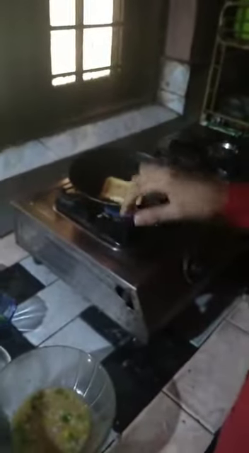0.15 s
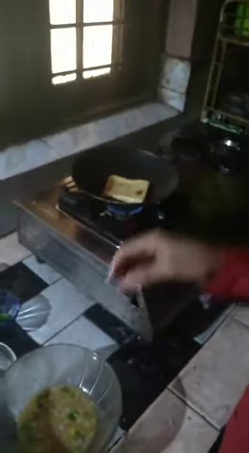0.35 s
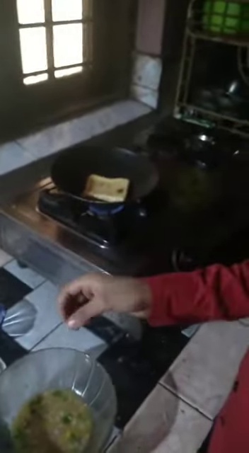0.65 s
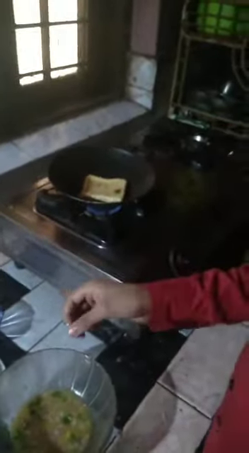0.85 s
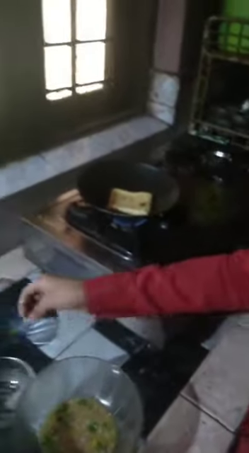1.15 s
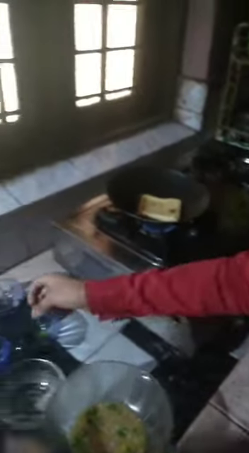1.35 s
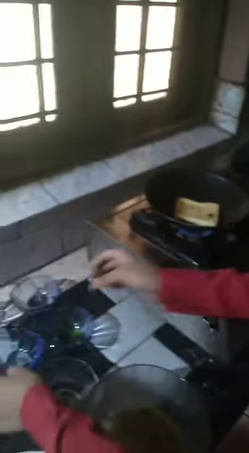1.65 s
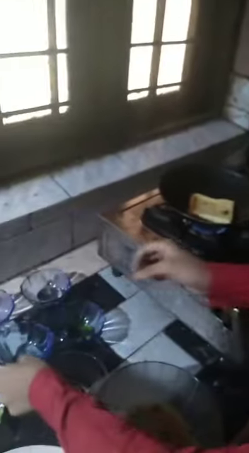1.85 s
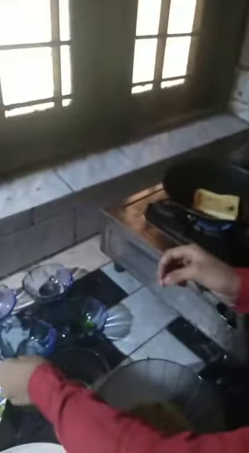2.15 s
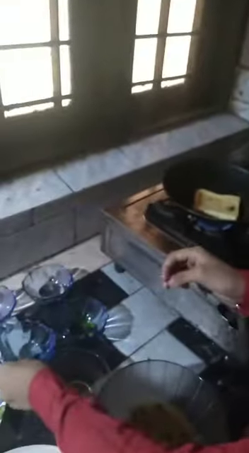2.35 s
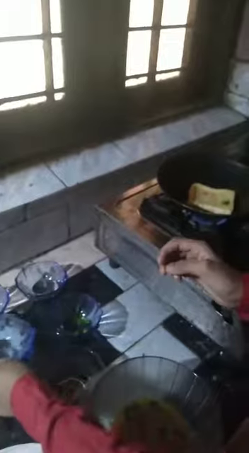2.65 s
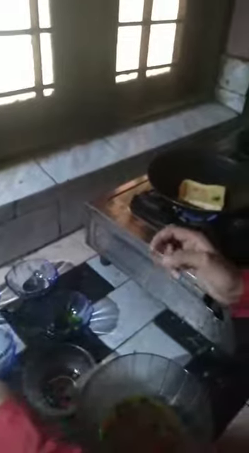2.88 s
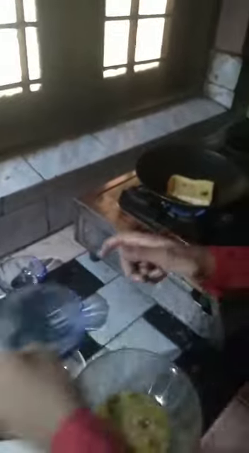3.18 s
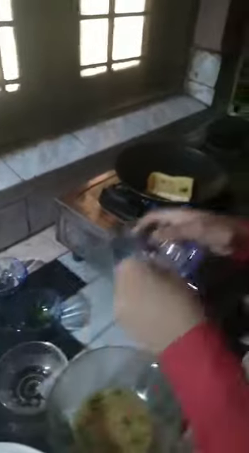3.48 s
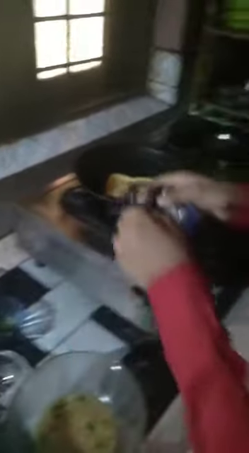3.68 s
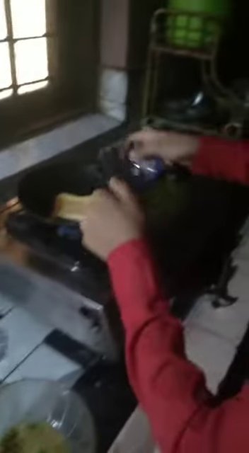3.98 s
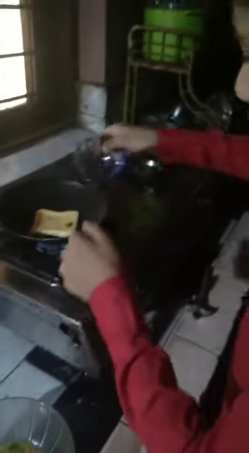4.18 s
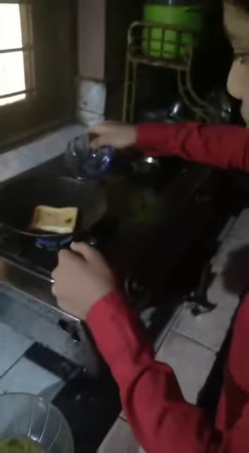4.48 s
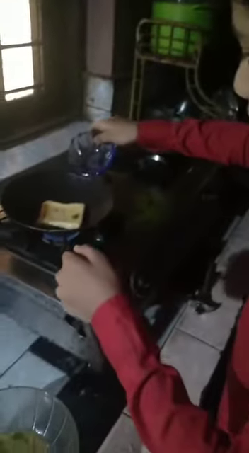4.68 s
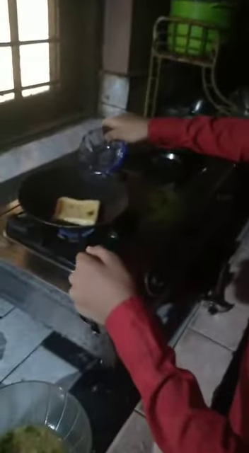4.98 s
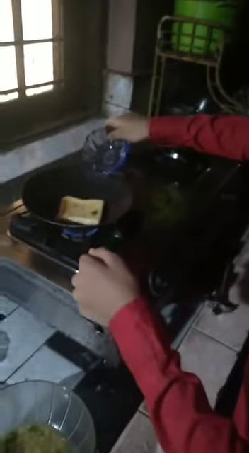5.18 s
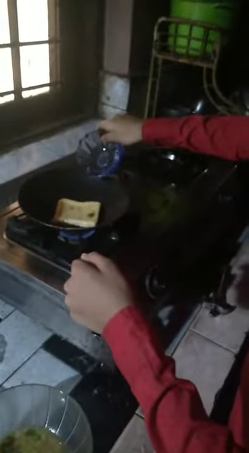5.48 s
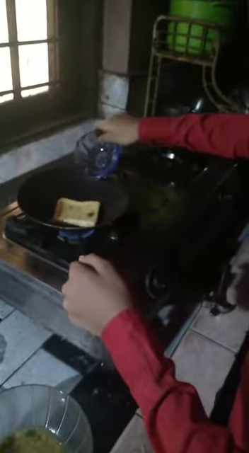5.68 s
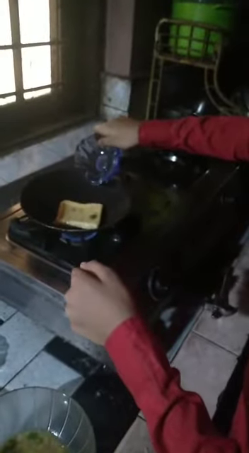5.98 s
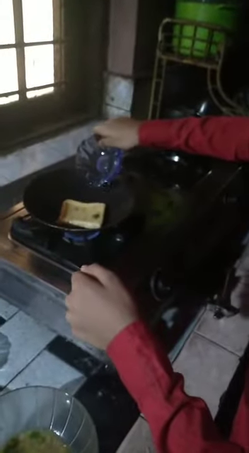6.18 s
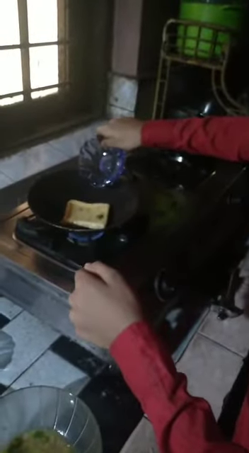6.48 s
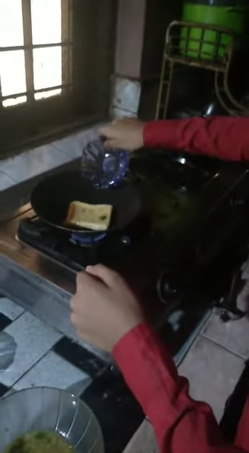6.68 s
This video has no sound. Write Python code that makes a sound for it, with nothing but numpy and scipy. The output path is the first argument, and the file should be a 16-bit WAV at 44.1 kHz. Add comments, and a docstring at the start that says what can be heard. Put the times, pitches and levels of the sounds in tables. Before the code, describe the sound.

A gas burner rumbles softly for the whole seven seconds in a small tiled kitchen, with the microphone close to the counter. From about 0.2 to 1.3 seconds a steel spatula knocks irregularly on a steel dish, and both ring briefly. The loudest knock comes at 0.5 seconds, and short, gritty scrapes join in between 0.8 and 1.3 seconds. At about 2.2 seconds a glass bowl rocks on the counter and clinks clearly against another, with a faint last tap at 2.6 seconds. Between 4.7 and 5.9 seconds come a few very quiet, dull bumps of things handled at the stove. Outside the window a small bird, distant and blurred by echoes, gives short falling chirps from the start until about 5.7 seconds, with a brief quavering whistle near 2.5 seconds. The last second holds only the burner.

```python
"""A small tiled kitchen, the microphone close to the counter. A gas burner rumbles softly all along, and
a small bird chirps outside the window, far off and smeared by echoes. Up close, a steel spatula knocks
on a steel dish, so that both ring, and sticks and slips as it is dragged over it. Then a glass bowl
rocks on the counter and clinks against another as it is picked up. Things handled at the stove give
soft bumps. Everything is centred; a faint delayed copy of some treble adds slight stereo width."""
import sys
import numpy as np
from scipy import signal
from scipy.fft import rfft, irfft
from scipy.io import wavfile
from scipy.ndimage import uniform_filter1d

SR = 44100
rng = np.random.default_rng(int(sys.argv[2]) if len(sys.argv) > 2 else 0)


def unload_wav(signal):
    """Save mono or channel-first audio to the path in sys.argv[1] as 16-bit WAV at rate SR, clipped to [-1, 1]."""
    wavfile.write(
        sys.argv[1],
        SR,
        np.round(np.clip(np.atleast_2d(signal).T, -1, 1) * 32767).astype(np.int16),
    )


N = 301644
TIME = np.arange(N) / SR
AGE = TIME[:24576]   # seconds since the start of one short sound

# Decay of the tiled room. Each row: frequency in Hz, t60 in seconds.
ROOM_T60 = [(200, 0.37), (1000, 0.44), (3000, 0.39), (6000, 0.3), (14000, 0.15)]
# The spatula blade's modes. Each row: frequency in Hz, relative level in dB, t60 in seconds before the cap.
SPATULA_MODES = [(1006.5, -11, 0.24), (1769, -12, 0.27), (1840, -12, 0.19), (1875, -15, 0.39),
                 (1968, -8, 0.15), (2065, -13, 0.068), (2386, -11.5, 0.11), (2228, -10, 0.15),
                 (2570, -11.5, 0.27), (2490, -11.5, 0.22), (2930, -13.5, 0.2), (3000, -12, 0.28),
                 (3100, -8.5, 0.14), (3295, -8.5, 0.32), (3100, -15.5, 0.53), (3250, -11.5, 0.74),
                 (3530, -14.5, 0.083), (3844, -12.5, 0.17), (5340, -16, 0.21), (5540, -13, 0.23),
                 (7030, -20, 0.3), (7000, -21, 0.19), (7660, -19.5, 0.12), (7900, -23, .15),
                 (8514, -25.5, .15), (10800, -29, 0.11), (11800, -25, 0.14), (12400, -32.5, .1)]
# Dense high modes of the steel. Each row: frequency in Hz, relative spectral density in dB.
STEEL_SPECTRUM = [(200, -28.5), (650, -22), (1000, -8.5), (1270, -14.5), (1800, -0.5), (2400, -4.5),
                  (2900, -0.5), (3400, 3), (4100, -2), (5300, -3.5), (6400, -10.5), (9000, -16),
                  (12500, -28), (16000, -34.5)]
# The hollow counter top. Each row: frequency in Hz, relative spectral density in dB.
COUNTER_SPECTRUM = [(60, -30.5), (130, -23.5), (180, -4.5), (250, 1), (330, -4), (420, 5), (560, -7),
                    (900, -1.5), (1500, -24.5), (4000, -60)]


def from_db(db):
    """Decibels to gain."""
    return 10 ** (np.asarray(db) / 20)


def rms_one(x):
    """Scale to an rms of 1."""
    return x / np.sqrt(np.mean(x ** 2) + 1e-20)


def at_hz(points, hz):
    """Read a table on a log-frequency axis."""
    f, value = np.transpose(points)
    return np.interp(np.log(hz + 0.00086), np.log(f), value)


def add(track, s, sound):
    """Mix a sound in at s seconds; what lies outside the track is dropped."""
    start = round(s * SR)
    sound, start = sound[max(-start, 0):], max(start, 0)
    track[start:start + len(sound)] += sound[:N - start]


def fade(t60):
    """Exponential decay, 60 dB down after t60 seconds."""
    return np.exp(-np.log(1000) / t60 * AGE)


def soft_rise(rise_s):
    """The onset of a gentle touch, which has no sharp edge."""
    return np.sin(np.pi / 2 * np.minimum(AGE / rise_s, 1)) ** 2


def noise(spectrum, slope_db=0, size=len(AGE)):
    """Coloured noise of rms 1, tilted by slope_db per octave: harder contacts favour the treble."""
    hz = np.fft.rfftfreq(size, 1 / SR)
    tilt = from_db(slope_db * np.log2(np.maximum(hz, 500) / 3000))
    bins = rfft(rng.standard_normal(size)) * from_db(at_hz(spectrum, hz)) * tilt
    return rms_one(irfft(bins, size))


def wash(spectrum, slope_db):
    """Dense modes and wall reflections of one blow: noise whose octaves die at the room's rates."""
    bins = rfft(noise(spectrum, slope_db))
    hz = np.fft.rfftfreq(len(AGE), 1 / SR)
    centres = 400 * 2. ** np.arange(6)
    return sum(irfft(bins * np.interp(hz, centres, share)) * fade(at_hz(ROOM_T60, centre))
               for centre, share in zip(centres, np.eye(len(centres))))


def ring(modes, spread_db=4.0, detune=0.0026, longest_t60=.28):
    """Modes struck once, each with its own strength and phase; contact pulls their pitch a little."""
    out = np.zeros(len(AGE))
    for hz, db, t60 in modes:
        strength = from_db(db + spread_db * rng.normal())
        pitch = hz * (1 + detune * rng.normal())
        decay = fade(min(t60, longest_t60))   # the cap keeps the ring short
        out += strength * decay * np.sin(2 * np.pi * (pitch * AGE + rng.random()))
    return out * np.minimum(AGE / .0007, 1)


def favour(modes, favoured_hz, contrast_db=15.5, width_octaves=0.049):
    """The point of contact drives the modes near one frequency harder than the rest."""
    driven = []
    for hz, db, t60 in modes:
        nearness = np.exp(-(np.log2(hz / favoured_hz) / width_octaves) ** 2)
        driven.append((hz, db + contrast_db * (nearness - 1 / 4), t60))
    return driven


def burner(rush_db=-55.5):
    """The gas flame's soft rush, with a lumpy low rumble."""
    # The rush. Each row: frequency in Hz, relative spectral density in dB.
    flame_spectrum = [(15, -71), (25, -34.5), (43, -23.5), (62, -2.5), (82, -6), (101, -8.5), (119, -18),
                      (183, -17), (215, -18.5), (281, -20), (378, -23), (523, -25), (2360, -35.5),
                      (3930, -37), (15500, -51)]
    # Low resonances of the flame. Each row: centre in Hz, width in Hz, level in dB.
    rumble_bands = [(83, 15, -58), (119.26, 18, -66.5), (175, 10, -72.5), (279.5, 30, -72.5)]
    out = from_db(rush_db) * noise(flame_spectrum, size=N)
    for hz, width, db in rumble_bands:
        resonance = signal.butter(2, [hz - width / 2, hz + width / 2], "band", fs=SR, output="sos")
        out += from_db(db) * rms_one(signal.sosfilt(resonance, rng.standard_normal(N)))
    return out


def sing(pitch, octave_db, sag_db=-7):
    """One bird note: a tone and its octave, coloured by throat and beak; it starts fast and weakens."""
    # Response of throat and beak. Each row: frequency in Hz, gain in dB.
    beak = [(2200, 1.5), (2800, -1.5), (3500, -1.5), (4000, 0), (5000, 3), (6000, -2.5), (7000, -8.5),
            (8000, -12.5)]
    phase = 2 * np.pi * np.cumsum(pitch) / SR
    fundamental = from_db(at_hz(beak, pitch)) * np.sin(phase)
    octave = from_db(octave_db + at_hz(beak, 2 * pitch)) * np.sin(2 * phase)
    sag = from_db(sag_db * np.linspace(-.5, .5, len(pitch)))
    return (fundamental + octave) * signal.windows.tukey(len(pitch), .2) * sag


def distant(note, direct, far_t60=0.92, near_t60=.45, near_db=3, build_s=.008):
    """On its way to the microphone, outside walls and the kitchen smear a note into echoes."""
    envelope = (fade(far_t60) + from_db(near_db) * fade(near_t60)) * (1 - np.exp(-AGE / build_s))
    echoes = rng.standard_normal(len(AGE)) * envelope
    echoes /= np.linalg.norm(echoes)
    echoes[0] += direct
    return signal.fftconvolve(note, echoes)


def bird(chirp_s=0.028, chirp_gain_db=5, rasp=.012, rasp_hz=1000, quaver=0.0093, quaver_hz=23):
    """Outside the window: chirps slide down with a slight flutter; whistles quaver around one pitch."""
    # Each row: start in seconds, relative level in dB, starting pitch in Hz.
    chirps = [(-.04, -50.5, 3350), (.934, -45, 4080), (1.677, -43, 3820), (2.38, -46, 4313),
              (3.445, -45.5, 3950), (4.025, -47, 3490), (4.319, -48.5, 3410), (4.594, -51.5, 3390),
              (4.932, -49.5, 3710), (5.294, -49.5, 3760), (5.709, -52, 3610)]
    # Each row: start in seconds, length in seconds, relative level in dB, pitch in Hz.
    whistles = [(2.538, 0.13, -54.5, 3834), (2.715, 0.029, -57, 3825)]
    usual_db, usual_top_hz, usual_end_hz = -48, 3700, 2330
    out = np.zeros(N)
    progress = np.linspace(0, 1, int(chirp_s * SR))
    slide = (1 - np.cos(np.pi * progress ** 1.1)) / 2   # lingers briefly on the top note
    for s, db, top_hz in chirps:
        raised_hz = top_hz - usual_top_hz
        end_hz = usual_end_hz + 0.26 * raised_hz
        octave_db = -7.5 - 0.78 * (db - usual_db) + 0.0004 * raised_hz   # louder, lower chirps are purer
        flutter = np.interp(progress * chirp_s * rasp_hz, np.arange(64), rng.standard_normal(64))
        pitch = top_hz + (end_hz - top_hz) * slide
        pitch *= 1 + rasp * np.sin(np.pi * slide * .8) * flutter
        add(out, s, from_db(db + chirp_gain_db) * distant(sing(pitch, octave_db), direct=0.2))
    for s, length, db, hz in whistles:
        pitch = hz * (1 + quaver * np.sin(2 * np.pi * quaver_hz * AGE[:int(length * SR)]))
        add(out, s, from_db(db) * distant(sing(pitch, octave_db=-19), direct=1.0))
    return out


def spatula_knocks(usual_db=-30, ring_db=-3.5, wash_db=0.5, trim_db=-1):
    """Steel on steel, up close: a crack, the ring of both parts, their wash and a thud in the counter."""
    # Each row: start in seconds, relative level in dB, brightness in dB per octave,
    # the dish's ring over the spatula's in dB, favoured frequency in Hz.
    knocks = [(.188, -31.5, 1, 13, 1620), (.208, -35, -2, 3.5, 982), (0.3472, -29.5, 0.5, 10, 3640),
              (0.4213, -50.5, -6, -27, 3330), (0.4836, -40.5, -5.5, 18, 2920), (0.505, -33, -7, -19, 2020),
              (0.519, -15.5, 1.5, -17.5, 2384), (0.5223, -20, -5, 10.5, 1051),
              (.674, -29.5, -1.5, -7.5, 1844), (.773, -39.5, -7.5, -9, 1860), (1.011, -45, 2, 16, 1020),
              (1.0258, -29, -1, -14, 1913), (1.1035, -38.5, -5.5, -6, 3150), (1.122, -38.5, 7.5, -29, 8700),
              (1.1681, -36.5, -1.5, -13, 3320), (1.172, -31.5, -1, -14, 1960),
              (1.1917, -30, 1.5, -16, 7800), (1.199, -29, -1, -12, 2100)]
    # The steel dish. Each row: frequency in Hz, relative level in dB, t60 in seconds before the cap.
    dish_modes = [(866, -12.5, 0.16), (956.5, -1, 0.16), (1086, -10.5, 0.13), (1446, -1, 0.16),
                  (1533, -10, 0.27), (1830, -14.5, .35), (2303, -1.5, 0.61), (2600, -10, 0.24),
                  (3294, 0, 0.28), (3400, -9, 0.34), (4032, -7.5, .23), (4610, -11.5, 0.37),
                  (6800, -17, 0.23), (7160, -22.5, .18)]
    out = np.zeros(N)
    thud_envelope = fade(ROOM_T60[0][1]) * (1 - np.exp(-AGE / .006))   # the heavy counter answers late
    for s, db, slope_db, balance_db, favoured_hz in knocks:
        force_db = db - usual_db
        crack_db = 5.5 + .4 * force_db   # harder knocks have more crack
        crack = from_db(crack_db) * noise(STEEL_SPECTRUM, slope_db + 1.2) * fade(t60=0.015)
        dish = from_db(ring_db + balance_db / 2) * ring(favour(dish_modes, favoured_hz))
        blade = from_db(ring_db - balance_db / 2) * ring(favour(SPATULA_MODES, favoured_hz))
        # The counter hardly minds the force, but a dish shaken more passes more on to it.
        thud_db = -42.5 + 0.22 * force_db + 0.096 * balance_db
        thud = from_db(thud_db) * noise(COUNTER_SPECTRUM) * thud_envelope
        tail = from_db(wash_db) * wash(STEEL_SPECTRUM, slope_db)
        steel = from_db(db + trim_db) * (crack + dish + blade + tail)
        rise_s = .0005 * np.exp(-0.48 * slope_db)   # duller contacts are softer
        add(out, s, np.minimum(AGE / rise_s, 1) * steel + thud)
    return out


def stove_bumps(room_db=-3, thump_t60=0.17):
    """Dull, quiet knocks of things being handled at the stove, each with a short room tail."""
    # Each row: start in seconds, relative level in dB.
    bumps = [(0.208, -45.5), (.497, -42.5), (2.077, -74), (4.713, -61.5), (4.829, -57.5), (5.026, -58),
             (5.131, -60), (5.695, -63), (5.82, -57.5)]
    # Colour of a bump. Each row: frequency in Hz, relative spectral density in dB.
    bump_spectrum = [(60, -15), (150, 1.5), (300, 1), (450, -3), (700, -42.5), (1120, -2.5), (1500, -24),
                     (3000, -18.5), (9000, -45), (16000, -63.5)]
    out = np.zeros(N)
    envelope = soft_rise(0.0022) * (fade(thump_t60) + from_db(room_db) * fade(ROOM_T60[1][1]))
    for s, db in bumps:
        add(out, s, from_db(db) * noise(bump_spectrum) * envelope)
    return out


def hand_pressure(length, attack_s=0.0066, sag_db_per_s=21.5, release_t60=0.075):
    """The hand bears down quickly, eases a little through the stroke and lifts off."""
    lifted_s = np.maximum(AGE - length, 0)
    release = np.exp(-np.log(1000) * lifted_s / release_t60)
    return np.minimum(AGE / attack_s, 1) * from_db(-sag_db_per_s * AGE) * release


def spatula_drag(slips_per_s=330, spread_db=6, crack_db=7, ring_db=-1, thud_db=-11):
    """The blade sticks and slips: a stroke is a run of tiny knocks, coloured by its point of contact."""
    # Each row: start in seconds, length in seconds, relative level in dB,
    # brightness in dB per octave, favoured frequency in Hz.
    strokes = [(.775, 0.1, -44.5, -7.5, 1950), (1.037, .095, -32.5, -3, 3280),
               (1.212, 0.055, -28, 0.5, 3210)]
    out, size = np.zeros(N), len(AGE)
    for s, length, db, slope_db, favoured_hz in strokes:
        slipping = rng.random(size) < slips_per_s / SR
        slips = slipping * from_db(spread_db * rng.normal(size=size)) * rng.choice([-1, 1], size)
        local_power = np.abs(uniform_filter1d(slips ** 2, size=1100))
        slips /= np.sqrt(local_power + 1e-4)   # the hand keeps up an even pressure
        crack = from_db(crack_db) * noise(STEEL_SPECTRUM, slope_db) * fade(t60=0.081)
        thud = from_db(thud_db) * noise(COUNTER_SPECTRUM) * fade(ROOM_T60[0][1])
        tail = wash(STEEL_SPECTRUM, slope_db)
        blade = from_db(ring_db) * ring(favour(SPATULA_MODES, favoured_hz), detune=0.0049)
        response = crack + thud + tail + blade
        response /= np.linalg.norm(response)
        add(out, s, from_db(db) * signal.fftconvolve(slips * hand_pressure(length), response))
    return out


def bowl_touch(knock_db, knock_slope_db, foot_db, glass_db, glass_slope_db, wash_db=-5):
    """One touch of a glass bowl: its foot knocks on the counter, and foot and glass ring."""
    # The glass bowl. Each row: frequency in Hz, relative level in dB, t60 in seconds before the cap.
    glass_modes = [(3835, -17, .35), (3898, -11, .21), (4323, 0, .24), (4362, -9, .2), (2740, -22, .2),
                   (4750, -9, .06), (7480, -15, .16), (7560, -20, .12), (8100, -23, .08), (11450, -23, .11)]
    # Modes of the foot on the counter. Each row: frequency in Hz, relative level in dB, t60 in seconds.
    foot_modes = [(1254, 0, 0.11), (1494, -5, 0.12), (1700, -7, 0.13), (1822, -2, 0.098)]
    # The foot's knock. Each row: frequency in Hz, relative spectral density in dB.
    foot_spectrum = [(100, -21.5), (350, -9.5), (700, -9.5), (1100, -10), (1600, -1.5), (2100, -8.5),
                     (3200, -12), (5000, -22), (8000, -35), (15000, -39)]
    tail = from_db(wash_db) * wash(foot_spectrum, knock_slope_db)
    crack = noise(foot_spectrum, knock_slope_db) * fade(t60=0.035)
    foot = from_db(foot_db) * ring(foot_modes, detune=0.011)
    tilted_modes = [(hz, db + glass_slope_db * np.log2(hz / 4300), t60) for hz, db, t60 in glass_modes]
    glass = from_db(glass_db) * ring(tilted_modes, spread_db=0.5)
    return soft_rise(0.0015) * (from_db(knock_db) * (crack + tail) + foot + glass)


def glass_bowls(rock_start_s=2.1631, rock_step_s=.006, rock_touches=6):
    """A bowl rocks on its foot with dull knocks, and rings clearly when glass meets glass."""
    # Each row: start in seconds, knock on the counter in dB, ring of the glass in dB,
    # brightness of that ring in dB per octave.
    clinks = [(2.18, -45, -50.5, 3), (2.2093, -36, -34, -7), (2.276, -44.5, -48, -6),
              (2.631, -51.5, -67, -5)]
    out = np.zeros(N)
    for k in range(rock_touches):
        touch = bowl_touch(knock_db=-50, knock_slope_db=-4, foot_db=-43, glass_db=-67.5, glass_slope_db=0)
        add(out, rock_start_s + k * rock_step_s, touch)
    for s, knock_db, ring_db, slope_db in clinks:
        clink = bowl_touch(knock_db, knock_slope_db=-0.7, foot_db=-52,
                           glass_db=ring_db, glass_slope_db=slope_db)
        add(out, s, clink)
    return out


def scene(width_db=-10, side_delay_s=.0007):
    """Everything is centred; a faint delayed copy of 6.5-11.5 kHz treble adds slight stereo width."""
    steel = spatula_knocks() + spatula_drag()
    mid = steel + glass_bowls() + stove_bumps() + bird() + burner()
    treble = signal.sosfilt(signal.butter(6, [6500, 11500], "band", fs=SR, output="sos"), steel)
    side = from_db(width_db) * np.interp(TIME - side_delay_s, TIME, treble)
    return np.array([mid + side, mid - side])


def record(dry, ceiling=.9, cutoff_hz=15900):
    """The loudest peak is rounded off near full scale and the top is cut."""
    rounded = dry / (1 + (dry / ceiling) ** 4) ** .25
    return signal.sosfilt(signal.ellip(10, .2, 70, cutoff_hz, fs=SR, output="sos"), rounded)


dry = scene()
out = record(dry)
unload_wav(out)
```